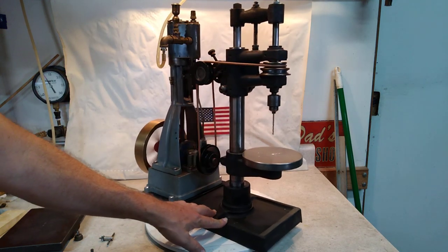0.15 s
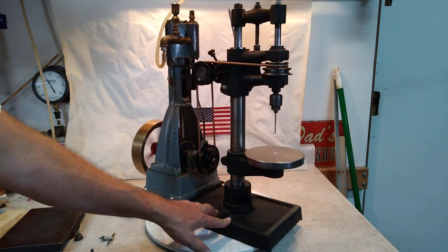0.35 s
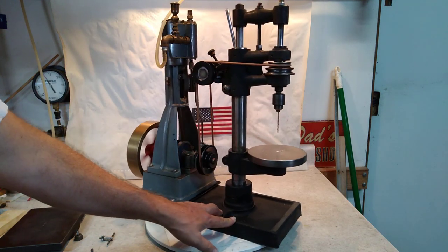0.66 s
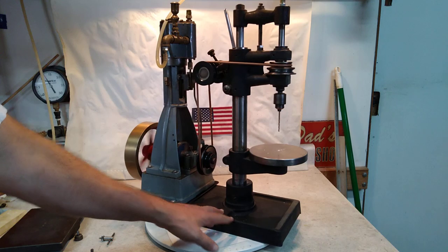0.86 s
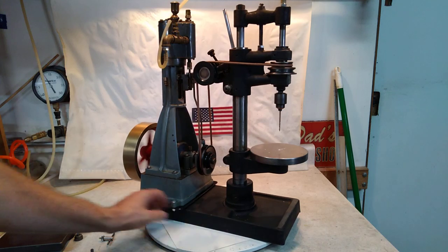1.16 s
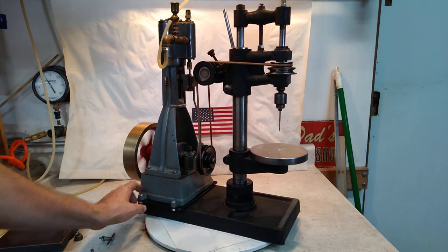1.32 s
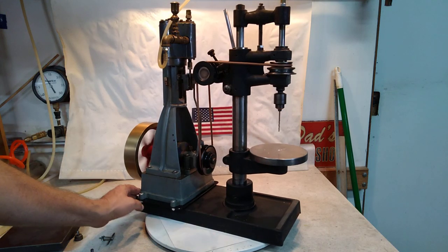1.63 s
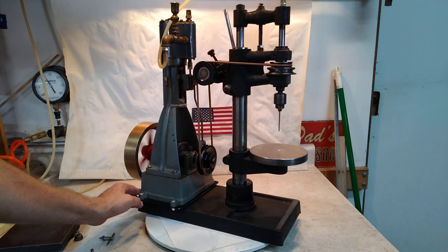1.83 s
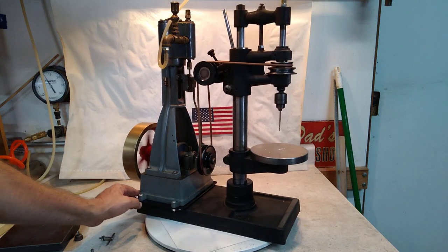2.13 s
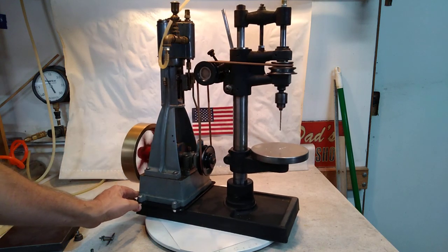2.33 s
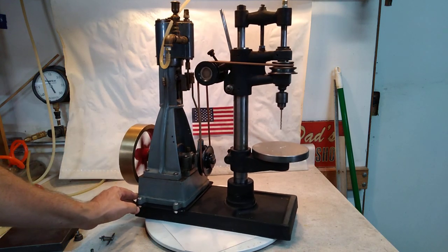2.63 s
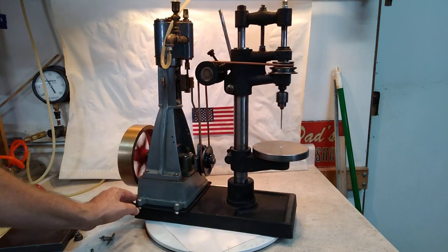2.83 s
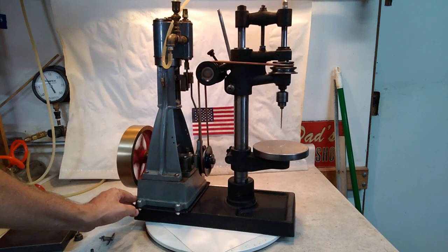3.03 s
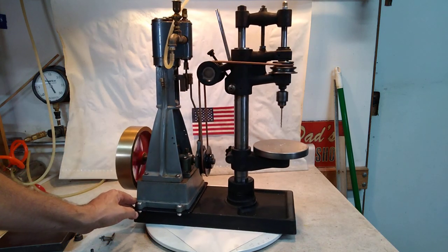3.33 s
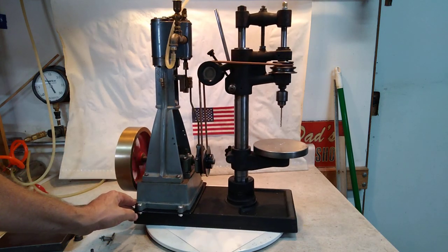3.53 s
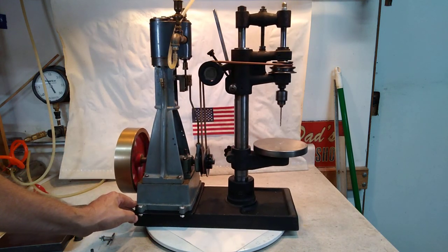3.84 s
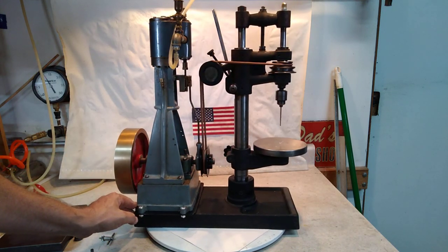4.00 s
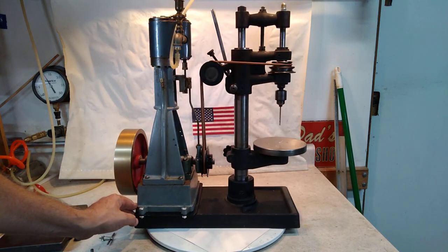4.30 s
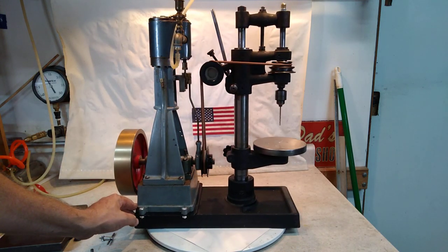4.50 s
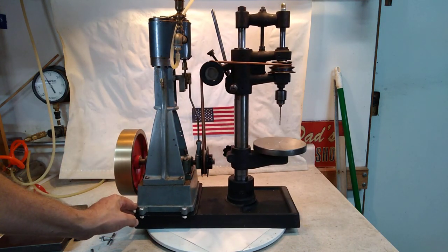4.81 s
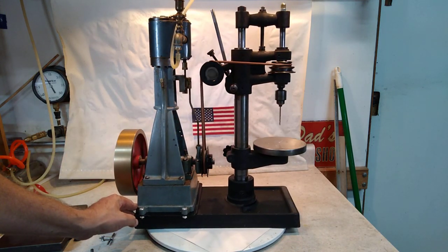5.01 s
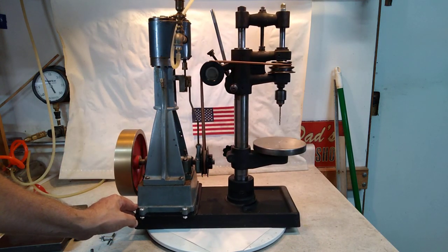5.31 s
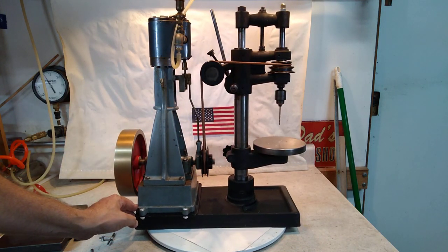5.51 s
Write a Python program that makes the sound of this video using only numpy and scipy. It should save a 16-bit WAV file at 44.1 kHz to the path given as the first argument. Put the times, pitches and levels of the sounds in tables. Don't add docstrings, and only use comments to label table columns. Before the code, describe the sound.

Quick, even chuffing of a small bench engine: bright spitting puffs, rattly low knocks, pulsing air leak and a few tiny metal ticks.

```python
import sys
import numpy as np
from scipy import signal
from scipy.fft import rfft, irfft, next_fast_len
from scipy.io import wavfile
from scipy.ndimage import uniform_filter1d

SR = 44100
rng = np.random.default_rng(int(sys.argv[2]) if len(sys.argv) > 2 else 0)


def inscribe(sig):
    pcm = np.round(np.clip(np.atleast_2d(sig).T, -1, 1) * 32767)
    wavfile.write(sys.argv[1], SR, pcm.astype(np.int16))


def makeup_ratio(level_db):
    decades = np.asarray(level_db, float) / 20
    return 10 ** decades


N = 249385

# top of stroke in seconds, puff level at top and at bottom in dB,
# rod jolt level at top and at bottom in dB.
CRANK_TURNS = [(-0.293, -15, -22, -43, -47), (0.074, -15, -20.5, -38.5, -46),
               (0.441, -15.5, -21, -44, -52.5), (0.807, -15.5, -22, -42.5, -53),
               (1.176, -17, -25, -44.5, -46.5), (1.542, -15.5, -20.5, -44, -47),
               (1.905, -19, -23, -44, -43.5), (2.27, -15.5, -20.5, -36.5, -46.5),
               (2.633, -15.5, -19.5, -44, -48.5), (2.998, -16.5, -20.5, -44.5, -46.5),
               (3.364, -15.5, -20.5, -40.5, -50.5), (3.726, -14.5, -18.5, -42, -41.5),
               (4.089, -14.5, -21.5, -40, -46), (4.451, -15, -22, -47.5, -40.5),
               (4.813, -14.5, -23.5, -46.5, -42), (5.176, -15, -21, -46, -49.5),
               (5.537, -17, -21, -40, -47)]
# time in seconds, share of full swing.
TURNTABLE = [
    (0, 0),
    (.85, 0),
    (1.0, .2),
    (2.7, .2),
    (3.3, .7),
    (4.25, 1),
    (5.2, 1),
    (5.65, .5),
]
# frequency in Hz, density in dB per Hz.
LEAK_SPECTRUM = [(18, -51), (30, -33), (221, -17), (486, -6), (649, -15), (1630, -24), (2410, -25),
                 (4080, -20), (4650, -12), (6380, -7), (9970, -7), (12000, -13), (16000, -12)]
# frequency in Hz, width in Hz, level over the hiss in dB.
GLAND_WHISTLES = [(2220, 69, 17.5), (8860, 130, -3), (10900, 430, -3.5)]
# position in strokes (0-1 up, 1-2 down), level in dB.
LEAK_PRESSURE = [(0, 11), (.3, 9), (.8, -1), (.99, 2), (1.3, 1.5), (1.8, 2.5), (1.99, -4.5)]
# frequency in Hz, width in Hz, level in dB, left over right in dB.
COLUMN_MODES = [(1601, 100, 1, 2.5), (1422, 203, -11, -3.5), (1688, 330, -10, 1), (2114, 27, -18, -16)]
# frequency in Hz, level in dB, T60 in seconds.
BENCH_MODES = [(52.5, -5.5, 0.34), (105.5, -1.5, 0.34), (131.5, 4.5, 0.24), (179, -7.5, 0.47),
               (262, -10, 0.6)]
# frequency in Hz, width in Hz, level in dB, left over right in dB.
FRAME_MODES = [(3100, 630, -18.5, -1.5), (3582, 86, -9, 2), (4220, 630, -18.5, 5), (4493, 25.6, -5, 12.5),
               (4640, 49, 2.5, 8), (4751, 103, -1.5, -3.5), (5170, 380, -16, 11), (5715, 46, -2.5, 4.5),
               (6840, 13500, -24, -3), (12480, 190, -2.5, -6.5), (14000, 100, -22, -14),
               (13800, 480, -9.5, 4), (14000, 300, -13, -1), (15600, 460, -5, 3.5)]
# frequency in Hz, width in Hz, level in dB, left over right in dB.
PORT_MODES = [(8880, 153, -1, 6), (9140, 110, -7, 8), (9396, 53, -2, -3.5), (9510, 107, -5.5, -3.5),
              (10070, 180, -2, -3.5), (10257, 99, 1.5, -1.5), (10640, 186, -3, 7), (11060, 200, -8.5, -1)]
# frequency in Hz, width in Hz, level in dB, left over right in dB.
CYLINDER_MODES = [(7630, 123, -2.5, 2), (7360, 67, -12, 9.5), (8000, 600, -11.5, 7.5)]
# frequency in Hz, level in dB, T60 in seconds, share of the swap.
PLATE_MODES = [(450.3, -0.5, 0.09, 0.74), (492.9, 0, 0.13, -0.9), (401, -9.5, 0.089, 0.28),
               (531, -5.5, 0.094, 0)]
# frequency in Hz, width in Hz, level in dB, left over right in dB.
BASE_MODES = [(703, 305, -12.5, 0), (907, 236, -9, 0), (1027, 87, -4.5, 0), (1125, 91, -4.5, 0),
              (1211, 85, -8.5, 0), (325, 69, -16, 0)]
# frequency in Hz, T60 in seconds.
WALL_T60 = [(300, 0.55), (1000, 0.25), (3000, 0.39), (5000, 0.32), (9000, 0.32), (15000, 0.25)]
# frequency in Hz, left-right likeness from 0 to 1.
LIKENESS = [(100, 0.86), (400, 0.86), (800, 0.54), (1500, 0.0081), (3000, 0), (15000, 0)]
# time in seconds, level in dB.
VALVE_TICKS = [(0.391, -52), (1.4154, -45), (2.3324, -43), (2.3614, -49), (2.5074, -40.5), (2.5224, -46),
               (3.4244, -42), (3.6017, -34), (3.6394, -46), (3.964, -42), (3.9754, -48), (4.0124, -52),
               (4.3414, -45), (5.3174, -55)]
# frequency in Hz, width in Hz, level in dB.
SPECTRUM_DIPS = [(2550, 500, -2.5), (6440, 330, -4.5), (12100, 300, -2)]

SPAN = 2 ** 15
HZ = np.fft.rfftfreq(SPAN, 1 / SR)
T_S = np.arange(SPAN) / SR
SIDES = np.array([[.5], [-.5]])
LEAD_S = .03
LAG_SAMPLES = 5
KNOCK_DB, FRAME_DB, CYLINDER_DB = (-44.5, -43.5), (-39.5, -41), (-34, -45)
KNOCK_SWING_DB, FRAME_SWING_DB = (0, 2), (1, 1.5)


def unit(x):
    return x / np.sqrt(np.mean(x ** 2) + 1e-20)


def along(points, hz):
    f, v = np.transpose(points)
    return np.interp(np.log(hz + 1), np.log(f + 1), v)


def add(track, s, sound):
    start = round((s + 1) * SR)
    track[:, start:start + sound.shape[1]] += sound


def paired(spectra, hz):
    turn = np.arccos(np.clip(along(LIKENESS, hz), -1, 1)) / 2
    mid, side = spectra[0] * np.cos(turn), spectra[1] * np.sin(turn)
    return np.array([mid + side, mid - side])


def strokes():
    s, puff_top, puff_bottom, jolt_top, jolt_bottom = np.transpose(CRANK_TURNS)
    turn_s = np.diff(s, append=2 * s[-1] - s[-2])
    bottom_s = s + .474 * turn_s
    rows = []
    for k in range(len(s)):
        rows.append((s[k], 0, puff_top[k], jolt_top[k]))
        rows.append((bottom_s[k], 1, puff_bottom[k], jolt_bottom[k]))
    return [row for row in rows if -.2 < row[0] < N / SR]


def leak():
    m = next_fast_len(N)
    hz = np.fft.rfftfreq(m, 1 / SR)
    whistles = 1 + sum(makeup_ratio(db) / (1 + ((hz - c) / w) ** 2) for c, w, db in GLAND_WHISTLES)
    right_db = 5 * np.exp(-((hz - 9700) / 1500) ** 2)
    hiss = paired(rfft(rng.standard_normal((2, m))), hz)
    air = hiss * whistles * makeup_ratio(along(LEAK_SPECTRUM, hz) - right_db * SIDES)
    ends_s = [row[0] for row in strokes()]
    stroke = np.interp(np.arange(N) / SR, ends_s + [ends_s[-1] + 0.19], np.arange(len(ends_s) + 1)) % 2
    pressure_db = np.interp(stroke, *np.transpose(LEAK_PRESSURE))
    return makeup_ratio(-55.5 + pressure_db) * unit(irfft(air, m)[:, :N])


def walls():
    hz, t, z = signal.stft(rng.standard_normal((2, SPAN)), SR, nperseg=256)
    patches = uniform_filter1d(rng.standard_normal(z.shape[1:]), size=2, axis=0)
    patches = uniform_filter1d(patches, size=14, axis=1)
    decay_db = -60 * t / along(WALL_T60, hz)[:, None] + 2.46 * unit(patches)
    tail = signal.istft(z * makeup_ratio(decay_db), SR, nperseg=256)[1][:, :SPAN]
    tail = tail * (1 - np.exp(-T_S / 0.0045)) * (T_S < .55)
    return paired(rfft(tail / np.linalg.norm(tail[0])), HZ)


def burst(peak_s, rise_s, fall_s, lumpy_db, lump_s):
    swell = np.clip(1 + (T_S - peak_s) / rise_s, 0, 1) ** 2.27
    shape = swell * np.exp(np.minimum(peak_s - T_S, 0) / fall_s)
    lumps = unit(uniform_filter1d(rng.standard_normal((2, SPAN)), round(lump_s * SR)))
    air = shape * makeup_ratio(lumpy_db * lumps) * rng.standard_normal((2, SPAN))
    return rfft(air / np.linalg.norm(air, axis=1, keepdims=True))


def resonances(modes, scatter_db):
    response = 0
    for c, w, db, pan_db in modes:
        sign = rng.choice([-1, 1])
        gain = sign * makeup_ratio(db + pan_db * SIDES + rng.normal(0, scatter_db, (2, 1)))
        response = response + gain * 1j * HZ * w / (c * c - HZ ** 2 + 1j * HZ * w)
    return response


def ringing(modes, start_s, attack_s):
    t, total = np.clip(T_S - start_s, 0, 1), 0
    for hz, db, t60_s in modes:
        decay = makeup_ratio(db + rng.normal(0, 1.03) - 60 * t / t60_s)
        total = total + decay * np.sin(2 * np.pi * hz * t + rng.normal(0, 0.47))
    return rfft(total * (1 - np.exp(-t / attack_s)))


def spread(puff, far, wet_db):
    return 0.9 * puff[0] + 0.53 * puff[1] * 2 * SIDES + makeup_ratio(wet_db) * puff[0] * far


def rod_jolt(db, jolt, far):
    direct = jolt[0] + 0.23 * jolt[1] * 2 * SIDES
    return makeup_ratio(db + 46) * resonances(COLUMN_MODES, scatter_db=1.5) * direct * (1 + makeup_ratio(-4.5) * far)


def bench_boom(s, far):
    db = -3 if s < .9 else -7
    boom = ringing(BENCH_MODES, LEAD_S + 0.0036, attack_s=0.011)
    return makeup_ratio(db - 56.5) * boom * (1 + makeup_ratio(-6.5) * far)


def frame_ring(db, shock, far):
    return makeup_ratio(db + 46) * resonances(FRAME_MODES, scatter_db=2.5) * spread(shock, far, wet_db=-2.0)


def port_puff(db, jet, far):
    gain = makeup_ratio(db + 30 - 9.5 * SIDES)
    return gain * resonances(PORT_MODES, scatter_db=0.0) * spread(jet, far, wet_db=-3.0)


def cylinder_ring(db, jet, far):
    return makeup_ratio(db + 45.5) * resonances(CYLINDER_MODES, scatter_db=1.0) * spread(jet, far, wet_db=-1.5)


def plate_ring(db, swing, far):
    swap_db = -1.5 + 9.5 * swing
    modes = [(hz, mode_db + share * swap_db, t60_s) for hz, mode_db, t60_s, share in PLATE_MODES]
    return makeup_ratio(db + 6.5) * ringing(modes, LEAD_S + 0.00893, attack_s=0.0072) * (1 + makeup_ratio(-9) * far)


def base_knock(db, knock, far):
    response = resonances(BASE_MODES, scatter_db=2.5)
    return makeup_ratio(db + 48.5) * response * paired(knock, HZ) * (1 + makeup_ratio(-2.5) * far)


def engine():
    track = np.zeros((2, N + 2 * SR))
    lag = np.exp(-2j * np.pi * HZ * LAG_SAMPLES / SR * (SIDES + .5))
    for s, end, puff_db, jolt_db in strokes():
        swing = np.interp(s, *np.transpose(TURNTABLE))
        knock_db = KNOCK_DB[end] + swing * KNOCK_SWING_DB[end]
        frame_db = FRAME_DB[end] + swing * FRAME_SWING_DB[end]
        far = walls()
        jet = burst(LEAD_S + .005, rise_s=0.016, fall_s=0.0059, lumpy_db=2.5, lump_s=0.00099)
        shock = burst(LEAD_S + 0.0047, rise_s=0.016, fall_s=.012, lumpy_db=1.0, lump_s=0.0014)
        jolt = burst(LEAD_S + 0.0015, rise_s=0.012, fall_s=.012, lumpy_db=0.5, lump_s=.002)
        knock = burst(LEAD_S + .017, rise_s=0.029, fall_s=.011, lumpy_db=2.5, lump_s=0.0018)
        stroke = port_puff(puff_db, jet, far) + cylinder_ring(CYLINDER_DB[end], jet, far)
        stroke = stroke + frame_ring(frame_db, shock, far) + rod_jolt(jolt_db, jolt, far)
        stroke = stroke + base_knock(knock_db, knock, far) + plate_ring(knock_db, swing, far)
        stroke = stroke + bench_boom(s, far)
        add(track, s - LEAD_S, irfft(stroke * lag, SPAN))
    return track[:, SR:SR + N]


def valve_gear():
    track, t = np.zeros((2, N + 2 * SR)), T_S[:SPAN // 16]
    for s, db in VALVE_TICKS:
        bright = np.diff(rng.standard_normal((2, len(t))), n=3)
        snap = bright * makeup_ratio(-60 * t[3:] / .005)
        add(track, s, makeup_ratio(db - 1 - 11 * SIDES) * snap)
    return track[:, SR:SR + N]


def scene():
    return engine() + valve_gear() + leak()


def roll_off(x):
    return signal.sosfilt(signal.butter(12, 16830, fs=SR, output="sos"), x)


def record(dry):
    m = next_fast_len(N + SPAN)
    hz = np.fft.rfftfreq(m, 1 / SR)
    low_cut = (1j * hz / (28 + 1j * hz)) ** 2
    dips_db = sum(db * np.exp(-((hz - c) / w) ** 2) for c, w, db in SPECTRUM_DIPS)
    band_limit = np.clip((15870 - hz) / 220, 0, 1) ** 2
    mix = irfft(rfft(dry, m) * low_cut * makeup_ratio(dips_db) * band_limit, m)[:, :N]
    return roll_off(mix)


dry = scene()
out = record(dry)
inscribe(out)
```